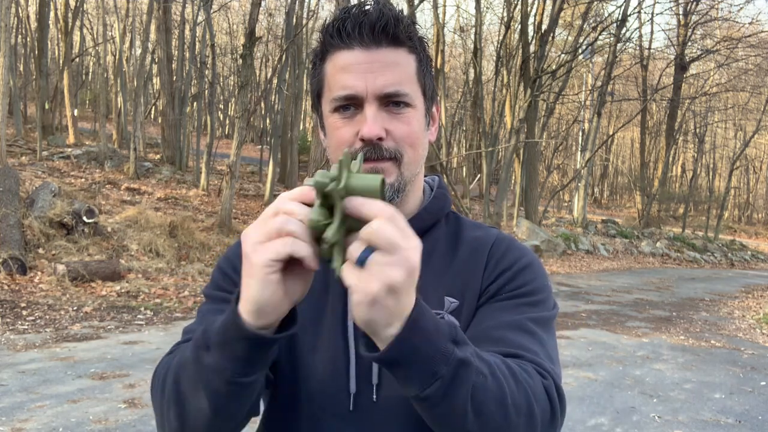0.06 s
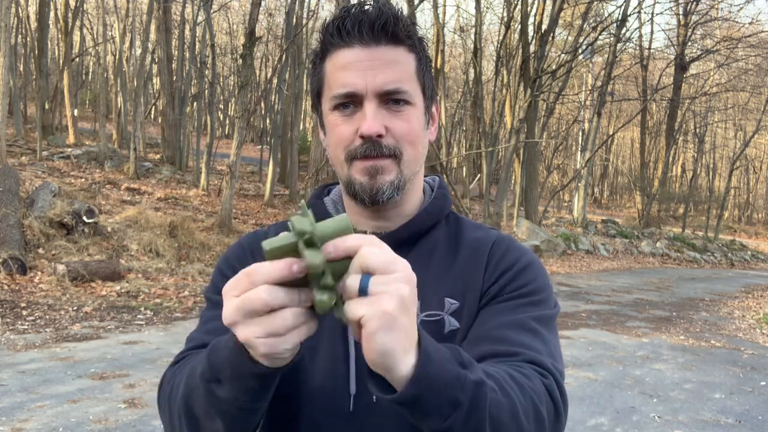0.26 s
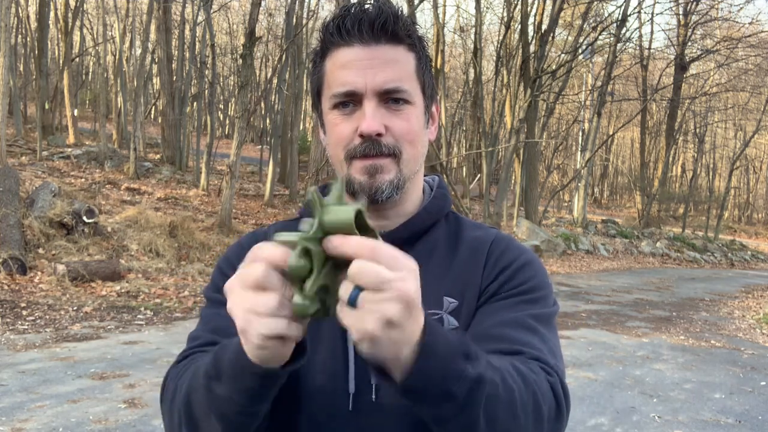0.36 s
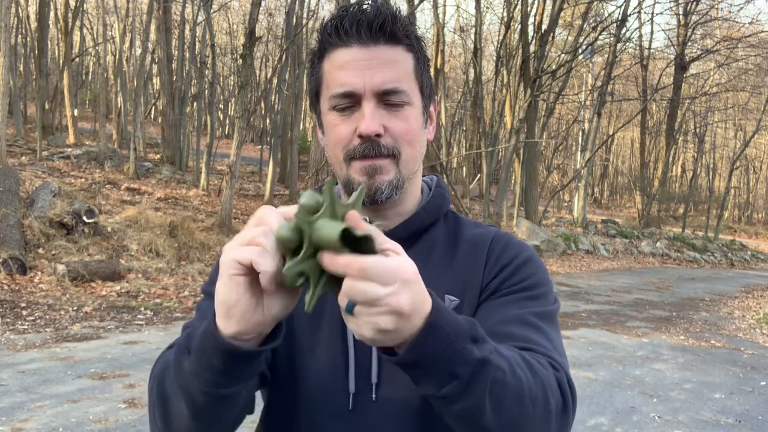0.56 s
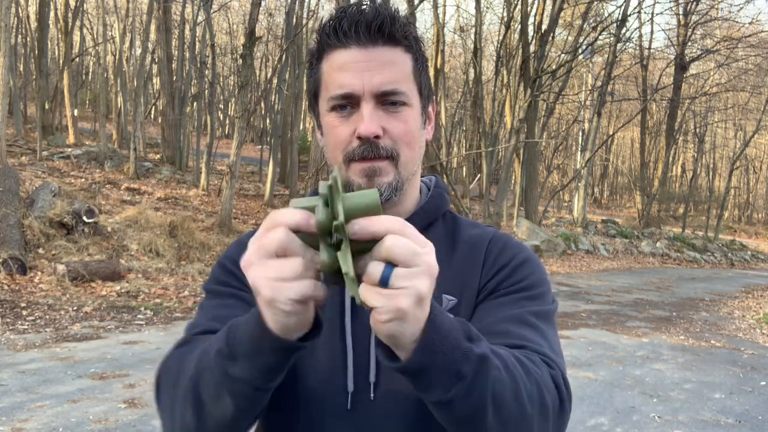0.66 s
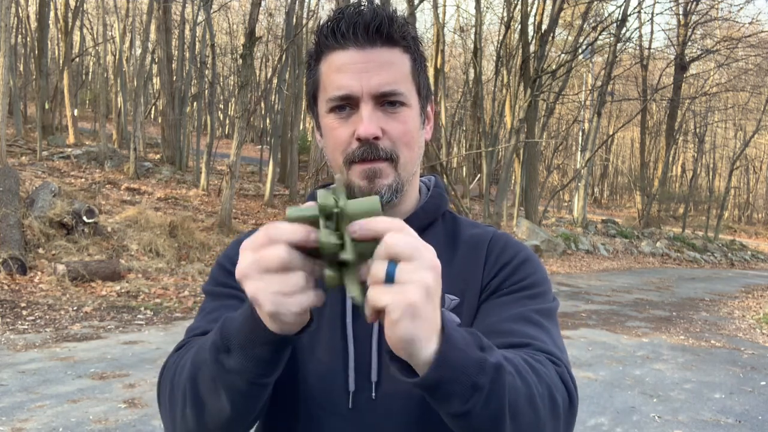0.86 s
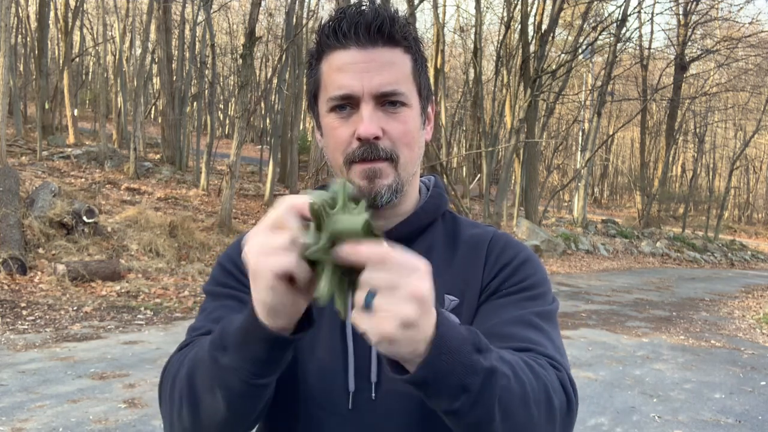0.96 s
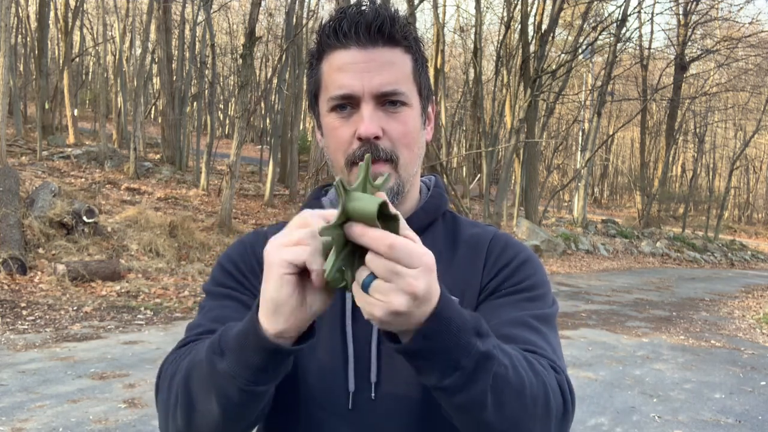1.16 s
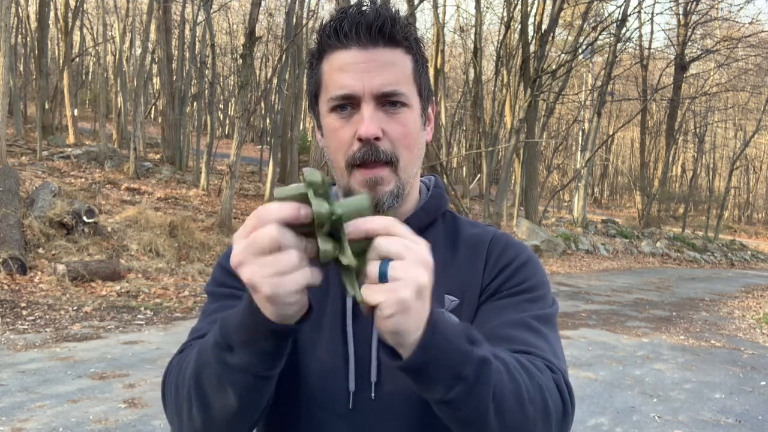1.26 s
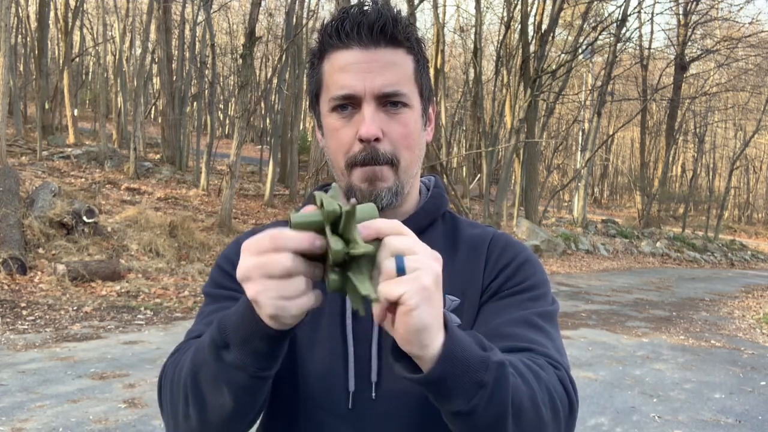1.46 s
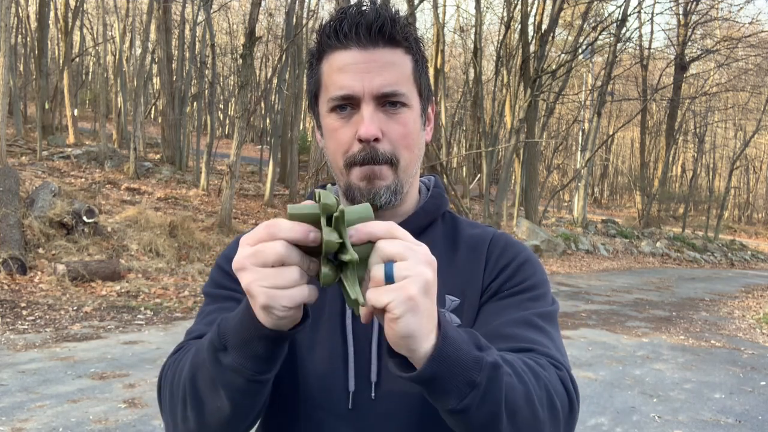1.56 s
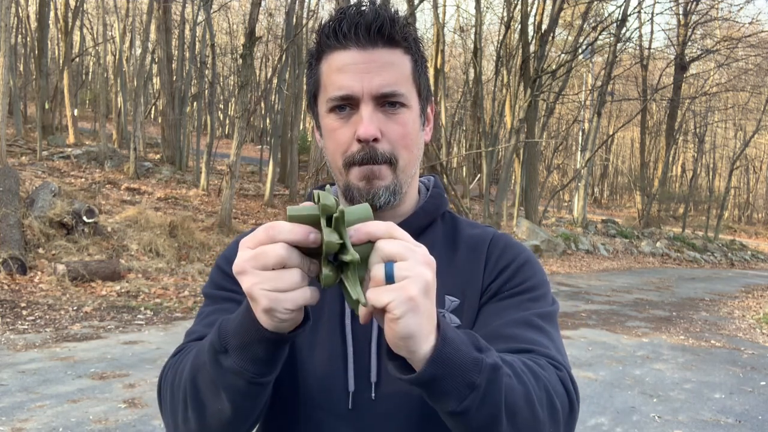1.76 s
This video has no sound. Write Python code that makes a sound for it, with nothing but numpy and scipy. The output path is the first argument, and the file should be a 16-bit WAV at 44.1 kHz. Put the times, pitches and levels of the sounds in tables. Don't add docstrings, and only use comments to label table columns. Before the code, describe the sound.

Hollow plastic rattle twisted by hand, sharp dry clicks clattering in quick uneven bursts outdoors

```python
import sys
import numpy as np
from scipy import signal
from scipy.fft import rfft, irfft, next_fast_len
from scipy.io import wavfile
from scipy.ndimage import uniform_filter1d, map_coordinates

SR = 44100
rng = np.random.default_rng(int(sys.argv[2]) if len(sys.argv) > 2 else 0)


def voltage_ratio(level):
    return 10 ** (np.asarray(level, float) / 20)


def store_wav(level_fs):
    pcm = np.round(np.clip(np.atleast_2d(level_fs), -1, 1) * 32767)
    wavfile.write(sys.argv[1], SR, pcm.T.astype(np.int16))


N = 79380


def along(points, hz):
    f, v = np.transpose(points)
    return np.interp(np.log(hz + 1), np.log(f + 1), v)


def filtered(x, response):
    m = next_fast_len(N + 8192)
    hz = np.fft.rfftfreq(m, 1 / SR)
    return irfft(rfft(x, m) * response(hz), m)[..., :N]


def causal(gain):
    cepstrum = irfft(np.log(gain + 1e-6))
    half = len(cepstrum) // 2
    cepstrum[1:half] *= 2
    cepstrum[half + 1:] = 0
    return np.exp(rfft(cepstrum))[:len(gain)]


# freq_hz, level_db
LEFT_PORT_LEVEL = [(100, -15), (700, -3), (1900, -8), (3000, -12), (4800, -19), (6000, -10), (8000, 0)]
# freq_hz, phase_lead_rad
LEFT_PORT_LEAD = [(300, 2), (700, 1.3), (1700, -.9), (3200, -1.7), (5500, 1.3), (8500, 3.1), (11500, 3.7),
                  (13000, 6.2)]


def ports(hz):
    left = voltage_ratio(along(LEFT_PORT_LEVEL, hz)) * np.exp(1j * along(LEFT_PORT_LEAD, hz))
    return np.array([left, np.ones_like(hz)])


# freq_hz, level_db
TUBE_COLOUR = [(300, -55), (800, -18), (1600, 4), (2700, 0.5), (6800, 1.5), (8600, -9.5), (12200, -23),
               (14300, -26)]


def tube_colour(hz):
    return voltage_ratio(along(TUBE_COLOUR, hz))


# freq_hz, level_db (per Hz)
AIR_SPECTRUM = [(20, -26), (40, -7.5), (63, 5), (140, -7.5), (330, -34), (1800, -25), (7500, -58),
                (13000, -44)]


def air():
    level_db, swell_db, alike = -56.5, 1.8, 0.9
    right, other = rng.standard_normal((2, N))
    left = alike * right + np.sqrt(1 - alike ** 2) * other
    x = filtered(np.array([left, right]), lambda hz: voltage_ratio(along(AIR_SPECTRUM, hz)) * abs(ports(hz)))
    swell = map_coordinates(rng.standard_normal(size=24), [np.arange(N) * 8 / SR])
    return voltage_ratio(level_db + swell_db * swell) * x / x[1].std()


# time_s, level_db
RUB_LEVEL = [(0, -66), (.05, -66.5), (.12, -64.5), (.3, -58), (1.8, -77)]


def fingers_rubbing():
    noise = rng.standard_normal((2, N))
    rub = filtered(noise, lambda hz: tube_colour(hz) * ports(hz))
    level_db = np.interp(np.arange(N) / SR, *np.transpose(RUB_LEVEL))
    return voltage_ratio(level_db) * rub


def scatter(x, decay, wait_s, size):
    out, step = np.zeros((2, N + 2 * SR)), SR // 20
    for start in range(0, N, step):
        hz, t, z = signal.stft(rng.standard_normal((2, size)), SR, nperseg=128)
        fade = voltage_ratio(-60 * t / along(decay, hz)[:, None])
        tail = signal.istft(z * fade, SR, nperseg=128)[1]
        tail = tail / np.linalg.norm(tail[0])
        wet = signal.fftconvolve(x[:, start:start + step], tail, axes=1)
        out[:, start + int(wait_s * SR):][:, :wet.shape[1]] += wet
    return out[:, :N]


# freq_hz, t60_s
TRUNK_DECAY = [(2000, 0.73), (8000, 0.27)]


def trunks(x):
    return voltage_ratio(-28.5) * scatter(x, TRUNK_DECAY, wait_s=0.014, size=SR // 2)


# freq_hz, t60_s
NEAR_DECAY = [(5000, 0.04), (10000, 0.014)]


def hands_and_ground(x):
    return voltage_ratio(-9.5) * scatter(x, NEAR_DECAY, wait_s=0.0014, size=4096)


# freq_hz, level_db
GRIP_SPECTRUM = [(120, -20), (250, 1), (430, 4), (800, -7), (1400, -35.5)]


def grip():
    level_db, grows, t60_s = -56.5, 0.49, 0.11
    blows = np.zeros(N)
    for start_s, db, *_ in CONTACTS:
        blows[round(start_s * SR)] = voltage_ratio(2 * grows * db)
    fade = voltage_ratio(-120 * np.arange(SR // 10) / SR / t60_s)
    shake = np.sqrt(abs(signal.fftconvolve(blows, fade)[:N]))
    rustle = shake * rng.standard_normal(N)
    x = filtered(rustle, lambda hz: causal(voltage_ratio(along(GRIP_SPECTRUM, hz))) * ports(hz))
    return voltage_ratio(level_db) * x / x[1].std()


def chatter():
    length_ms, slip_ms = 2.41, 0.4
    after_db, scatter_db, fade_db = -2, 3, 6
    gap_luck, size_luck, sign_luck = rng.random((3, 16))
    at_ms = np.cumsum(slip_ms * (0.3 + 1.4 * gap_luck))
    at_ms -= at_ms[0]
    size = voltage_ratio(after_db + scatter_db * (2 * size_luck - 1) - fade_db * at_ms / length_ms)
    size = size * np.clip((length_ms - at_ms) / slip_ms + 1, 0, 1)
    hits = np.where(at_ms > 0, size * np.sign(sign_luck - 0.5), 1)
    return np.bincount((at_ms * SR / 1000).astype(int), hits)


def struck(f, level, t60, train, crack_db):
    crack_t60_s, detune, mode_db, left_scatter_rad = 0.0035, 0.04, 2, 0.35
    pitch_luck, level_luck, side_luck = rng.standard_normal((3, len(f)))
    t = np.arange(SR // 40) / SR
    f = f * (1 + detune * pitch_luck * (np.arange(len(f)) > 0))
    side = np.array([np.exp(1j * left_scatter_rad * side_luck), np.ones_like(f)])
    crack = voltage_ratio(crack_db - 60 * t / crack_t60_s) * rng.standard_normal(len(t))
    onset = 1 - np.exp(-t * f[:, None])
    ring = voltage_ratio(-60 * t / t60) * np.exp(2j * np.pi * f[:, None] * t) * onset
    body = ((side * voltage_ratio(level + mode_db * level_luck)) @ ring).imag
    wave = signal.fftconvolve(body + crack, train[None], axes=1)
    return wave / np.sqrt(2 * uniform_filter1d(wave[1] ** 2, size=50).max())


# freq_hz, level_db
SHELL_MODES = [(915, 4), (1330, 1.5), (1800, 1.5), (2170, -14.5)]
# freq_hz, level_db
TINE_MODES = [(3650, -1.5), (3200, -11.5), (3930, -13), (4745, -3), (5380, -4), (6000, -7), (6840, -11),
              (9100, -13.5)]
# start_s, level_db (peak), tube_hz, tine_hz (loudest),
# tines_over_tube_db
FIRST_CONTACTS = [(0.119, -42, 2320, 4830, -6), (0.158, -39.5, 2280, 4940, 3), (0.1643, -27, 2200, 3800, -0.5),
                  (0.168, -27, 2000, 3640, -18), (0.1818, -33.5, 1550, 3100, -4.5),
                  (0.2062, -26, 2280, 3590, 2.5), (0.2209, -6.5, 2000, 4600, -6.5),
                  (0.232, -7.5, 2070, 4060, -2), (0.2395, -5.5, 2020, 3940, 4), (0.2438, -3.5, 1970, 3170, 3),
                  (0.248, -8, 1800, 3650, 4), (0.259, -18, 2170, 3530, 6), (0.2663, -12, 2390, 4250, 5.5),
                  (0.2693, -17.5, 1790, 5070, -1.5), (0.366, -41, 1800, 3710, -1.5),
                  (0.407, -18.5, 1780, 3440, -4), (0.4111, -21, 1800, 3620, -15.5),
                  (0.418, -4.5, 2110, 3530, -1), (0.422, -6.5, 2030, 5940, 6.5), (0.4239, -3, 2210, 5650, -5),
                  (0.4341, -25, 1885, 3600, 0), (0.4663, -26.5, 2210, 3670, -3.5),
                  (0.4782, -14, 2120, 3700, 3), (0.482, -20, 1900, 4700, -11), (0.4845, -18, 2120, 3980, -5),
                  (0.4883, -12.5, 1860, 4200, -5.5), (0.5084, -20, 1730, 3400, -4)]
MORE_CONTACTS = [(0.5325, -33.0, 1800, 3200, -0.5), (0.5379, -11, 1850, 3190, 2.5),
                 (0.5398, -23.5, 1650, 3250, 1.5), (0.5553, -18.5, 1670, 3100, 6),
                 (0.556, -11, 1570, 3140, 9.5), (0.5587, -16.5, 1770, 3730, -0.5),
                 (0.5607, -17, 1700, 3120, 3), (0.5783, -18.5, 1870, 3360, 1),
                 (0.5805, -16, 1950, 3600, -10), (0.5954, -35.5, 1730, 3510, -0.5),
                 (0.6019, -4.5, 2200, 3820, 4), (0.6117, -10.5, 1650, 5150, 9),
                 (0.6349, -13.5, 1710, 3760, -1.5), (0.637, -9.5, 1940, 3550, -2),
                 (0.6542, -9, 2050, 3600, -5.5), (0.6573, -8, 2150, 3630, 9.5),
                 (0.6697, -18, 1980, 3630, -1), (0.6983, -21.5, 2090, 3900, -17),
                 (0.7043, -17.5, 1840, 3600, 15), (0.7053, -17.5, 1740, 3240, -6),
                 (0.7095, -19.5, 2100, 3650, 8.5), (0.7123, -2.5, 2260, 5660, 6),
                 (0.716, -2.5, 2200, 3070, 3), (0.7224, -14.5, 1830, 3056, -20.5),
                 (0.7332, -0.5, 1685, 4940, 6), (0.7337, -10.5, 1736, 4830, 9),
                 (0.737, -3.5, 1930, 3870, -3.5), (0.7436, -11.5, 1760, 3785, 11.5),
                 (0.7508, -11.5, 2170, 3650, 4.5), (0.7536, -2.5, 2140, 3800, 0.5),
                 (0.7606, -14.5, 2170, 3400, 6), (0.7686, -14.5, 1620, 3680, 6),
                 (0.7808, -12.0, 1670, 3200, 4)]
LATER_CONTACTS = [(0.8328, -29, 1750, 3560, 6), (0.8486, -17, 1750, 4900, -1), (0.8651, -15, 1800, 3650, -3),
                  (0.8813, -17.5, 1810, 3630, 0), (0.8931, -24.5, 1780, 3820, 4),
                  (0.9148, -33.5, 1740, 3700, 1.5), (0.9346, -33, 1660, 3620, 0.5),
                  (0.9413, -24.5, 1770, 3460, -2), (0.9518, -21, 1670, 3580, -3.5),
                  (0.9632, -20.5, 1460, 4060, 3.0), (0.9668, -14, 1860, 3650, 0),
                  (0.9918, -2.5, 2200, 3730, -0.5), (1.0067, -0.5, 2200, 4060, -2.5),
                  (1.0114, -7.5, 2200, 3200, 4.5), (1.0129, -11.5, 1930, 5350, 7),
                  (1.0194, -8.5, 2160, 3650, -6.5), (1.022, -22.5, 2020, 3640, 14.5),
                  (1.0278, -14, 2210, 3780, 0), (1.0499, -28, 1780, 3650, 0.5), (1.0637, -27, 1930, 4800, 0.5),
                  (1.0718, -4.5, 1890, 5080, 10), (1.0739, -2, 2100, 5760, 14), (1.0771, -11, 1990, 3770, 16),
                  (1.083, -12.5, 1890, 6140, -4.5), (1.1458, -37, 1810, 4730, 0.5),
                  (1.1554, -21.5, 2110, 5440, -6.5), (1.1685, -12, 1840, 3810, 11.5),
                  (1.1751, -7, 1990, 5630, -4), (1.205, -21, 1820, 3520, 0.5),
                  (1.2115, -18.5, 1750, 3690, 20.5), (1.2235, -19, 2010, 3330, -11.5),
                  (1.2265, -26, 1800, 2980, 2.5), (1.248, -30.5, 2000, 3500, 1.5)]
LAST_CONTACTS = [(1.2822, -28.0, 2010, 3200, 4), (1.285, -30.5, 1960, 3000, 12),
                 (1.29, -20.5, 1850, 3420, 2.5), (1.2997, -20.5, 1690, 4670, 4),
                 (1.3079, -10, 2290, 4770, 7.5), (1.3102, -7, 2130, 5570, -4), (1.32, -5, 1610, 3100, 4),
                 (1.3297, -17, 1930, 3990, -16), (1.35, -27, 1910, 3240, -4.5),
                 (1.3564, -19, 1750, 3680, 2.5), (1.3594, -9.5, 1800, 5180, -7),
                 (1.3655, -27.5, 1830, 3640, 7.5), (1.3702, 1.5, 1795, 3470, -0.5),
                 (1.3792, -5, 1797, 3300, 10), (1.3891, -31, 1510, 3680, -2.5),
                 (1.4193, -42, 1794, 3910, -10.5), (1.4248, -28, 1707, 3540, 4.5),
                 (1.436, -5.5, 1815, 3650, -10), (1.4449, -33.5, 1700, 3670, -27),
                 (1.4544, -21, 1814, 5180, -5), (1.4623, -14, 1697, 3900, 5.5),
                 (1.4655, -11, 1950, 3470, 11), (1.4679, -5, 1792, 5000, 1), (1.4785, -25, 1523, 3910, -13),
                 (1.5002, -15.5, 1670, 4950, 20), (1.5008, -7.5, 1650, 3710, 4.5),
                 (1.5125, -33, 1670, 3580, -9), (1.5889, -20, 1755, 3540, -2.5),
                 (1.5903, -23.5, 1915, 3556, -8), (1.5986, -25.5, 1793, 3600, -9),
                 (1.6105, -15.5, 2163, 3940, 4)]
CONTACTS = FIRST_CONTACTS + MORE_CONTACTS + LATER_CONTACTS + LAST_CONTACTS


def rattle():
    tube_t60_s, shell_t60_s, tine_t60_s, long_t60_s = 0.0095, 0.008, 0.0065, 0.015
    tube_db, struck_tine_db = 5, 4.5
    touch_us, softer = 8.5, 0.36
    full_crack_db, harder = 6.5, 0.49
    lead_s = 0.00045
    low_t60 = np.array([tube_t60_s] + [shell_t60_s] * len(SHELL_MODES))[:, None]
    high_t60 = np.array([shell_t60_s, long_t60_s] + [tine_t60_s] * (len(TINE_MODES) - 1))[:, None]
    out, k = np.zeros((2, N + SR)), np.arange(-8, 9)
    for start_s, db, tube_hz, tine_hz, bright_db in CONTACTS:
        touch = np.exp(-0.5 * (k / (touch_us * voltage_ratio(-softer * db) * SR / 1e6)) ** 2)
        train = np.convolve(chatter(), touch)
        crack_db = full_crack_db + harder * db
        f, level = np.transpose([(tube_hz, tube_db)] + SHELL_MODES)
        low = struck(f, level, low_t60, train, crack_db)
        f, level = np.transpose([(tine_hz, struck_tine_db)] + TINE_MODES)
        high = struck(f, level, high_t60, train, crack_db)
        bright = voltage_ratio(bright_db)
        sound = voltage_ratio(db) * (low + bright * high) / np.hypot(1, bright)
        first = round((start_s - lead_s) * SR) - 8
        out[:, first:][:, :sound.shape[1]] += sound
    return filtered(out[:, :N], lambda hz: causal(tube_colour(hz)) * ports(hz))


def scene():
    x = rattle()
    background = air() + trunks(x)
    handling = fingers_rubbing() + grip()
    return background + handling + hands_and_ground(x) + x


def roll_off(x):
    return signal.sosfilt(signal.butter(12, 15920, fs=SR, output="sos"), x)


def record(dry):
    top_hz, edge_hz = 15900, 900
    limited = filtered(dry, lambda hz: np.clip((top_hz - hz) / edge_hz, 0, 1) ** 2)
    heard = np.clip(limited, -1, 1)
    return roll_off(heard)


dry = scene()
out = record(dry)
store_wav(out)
```